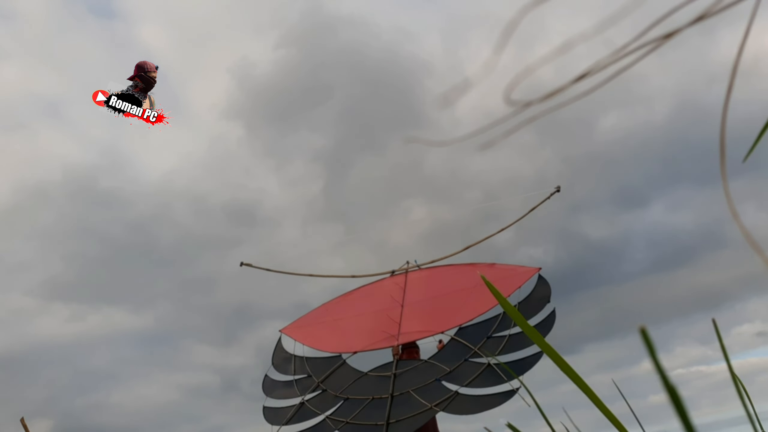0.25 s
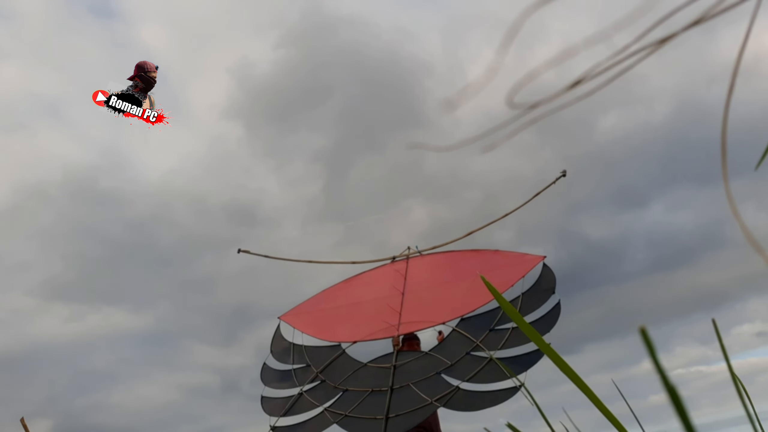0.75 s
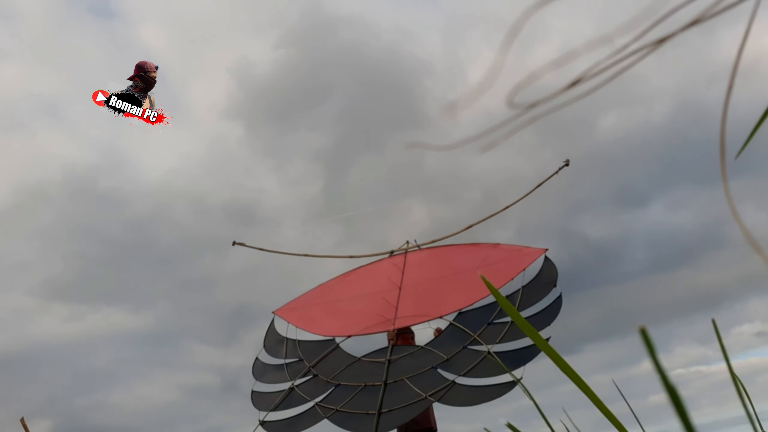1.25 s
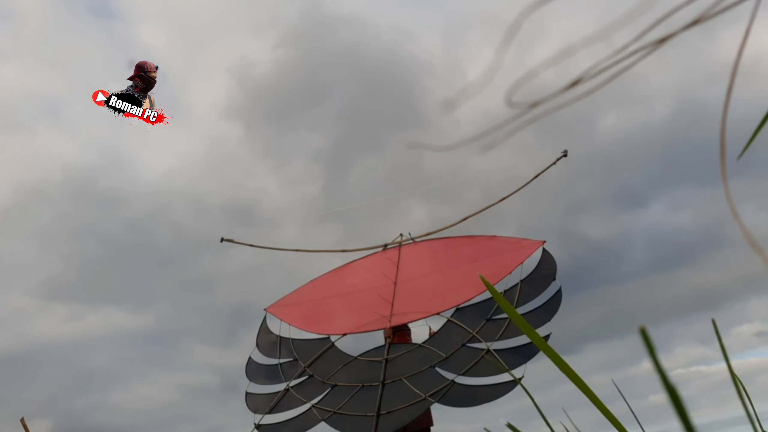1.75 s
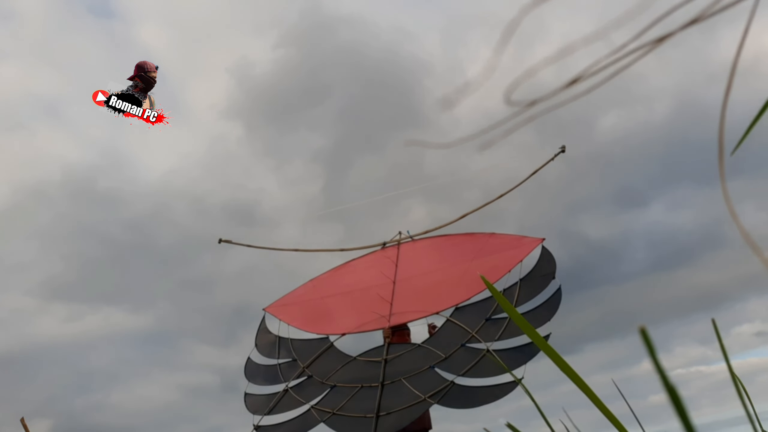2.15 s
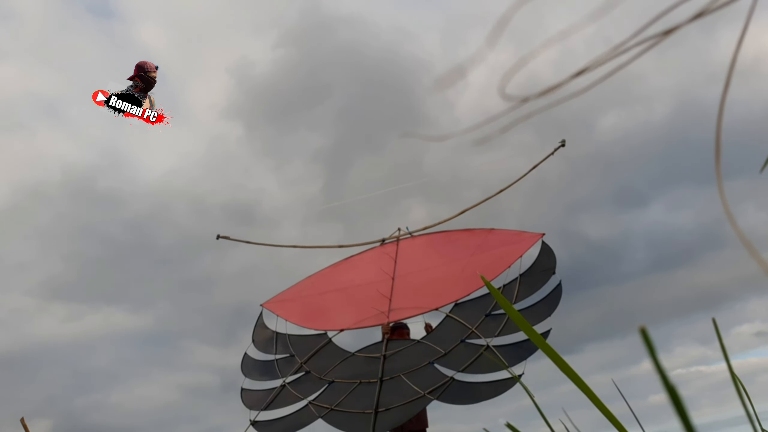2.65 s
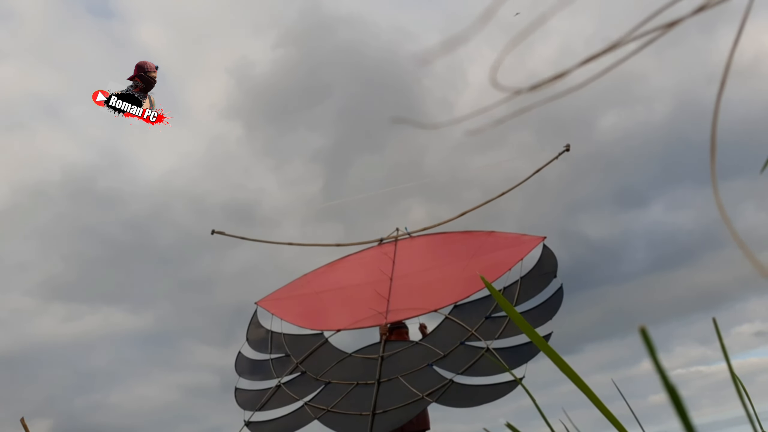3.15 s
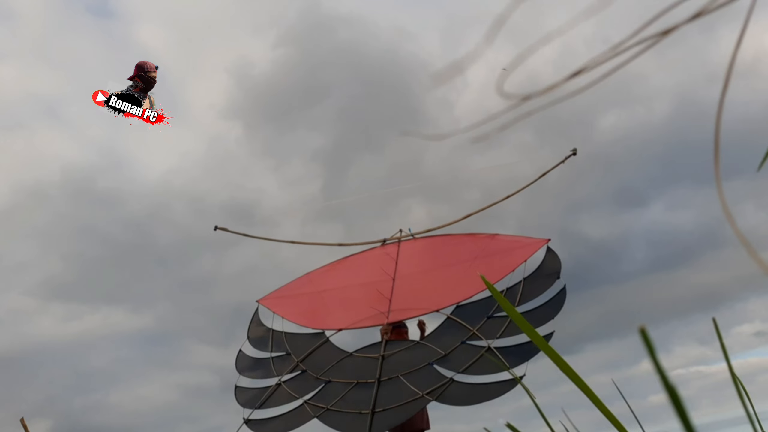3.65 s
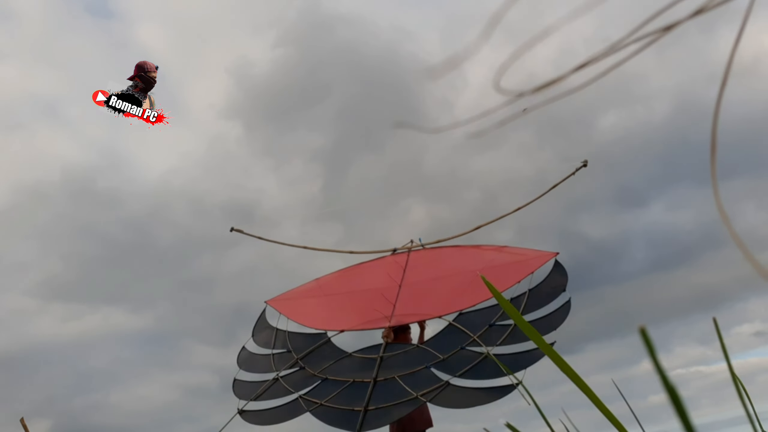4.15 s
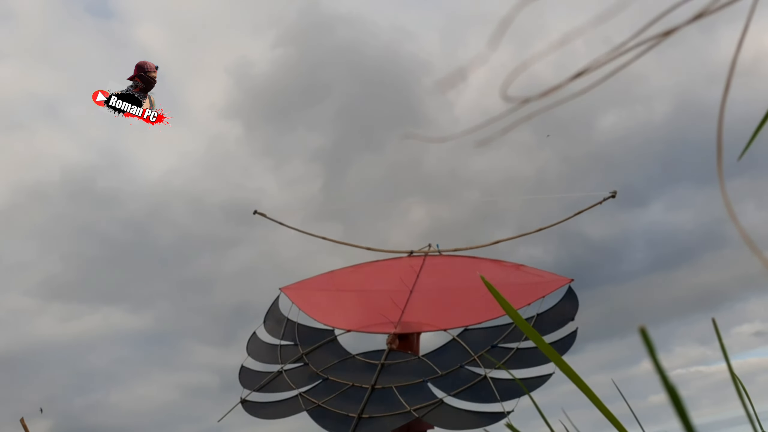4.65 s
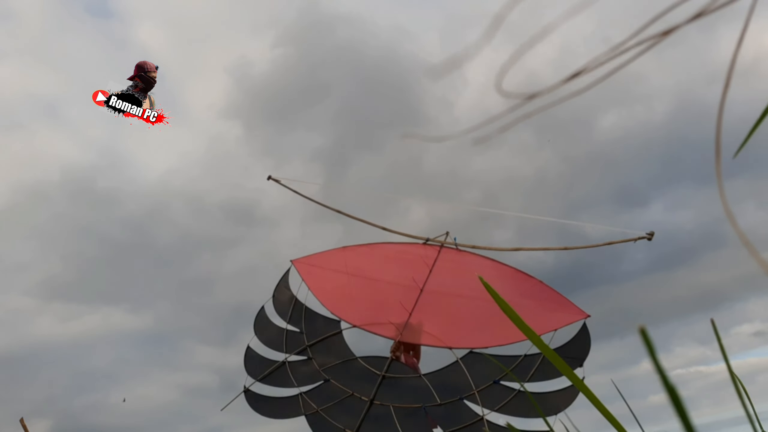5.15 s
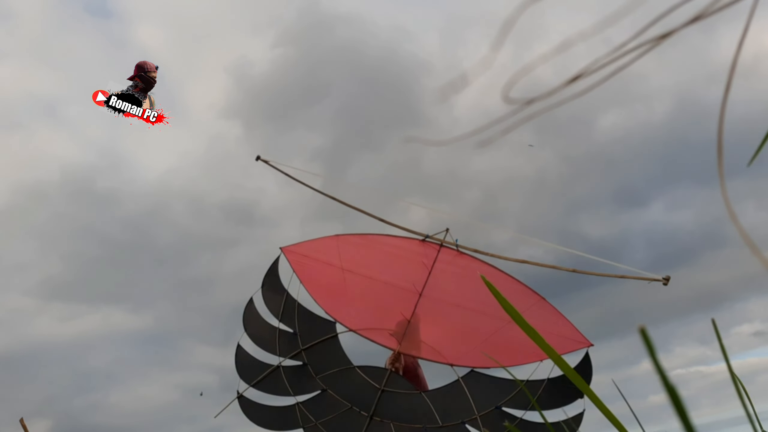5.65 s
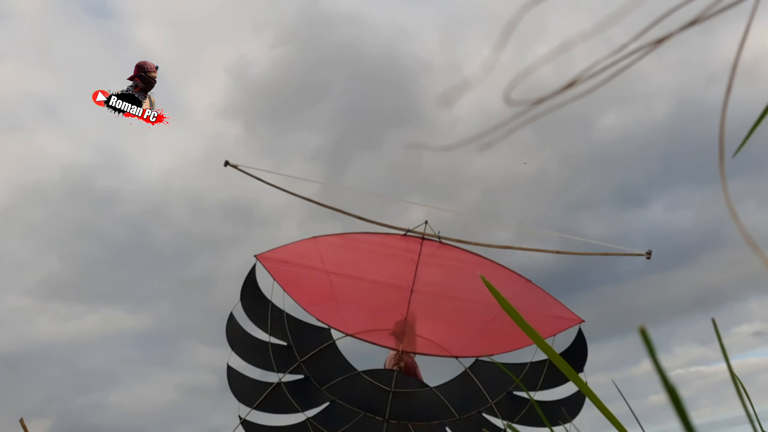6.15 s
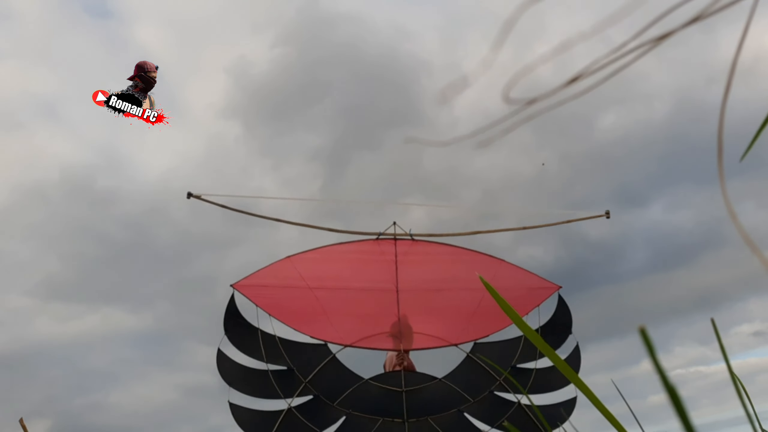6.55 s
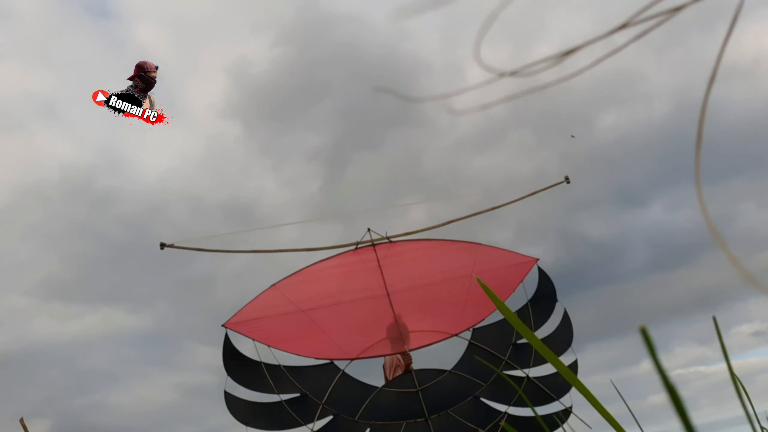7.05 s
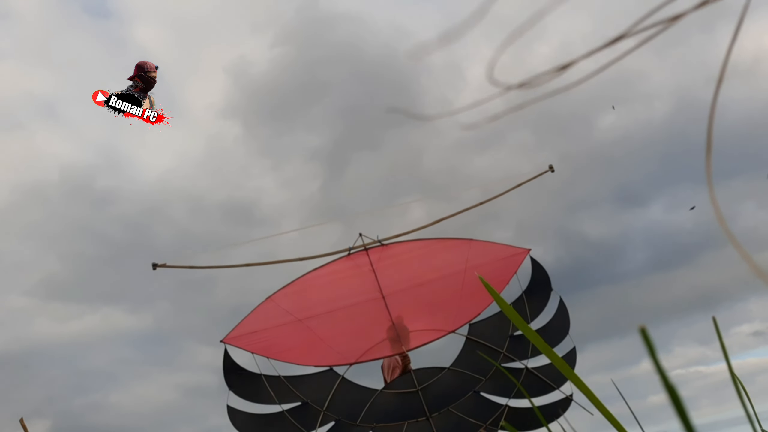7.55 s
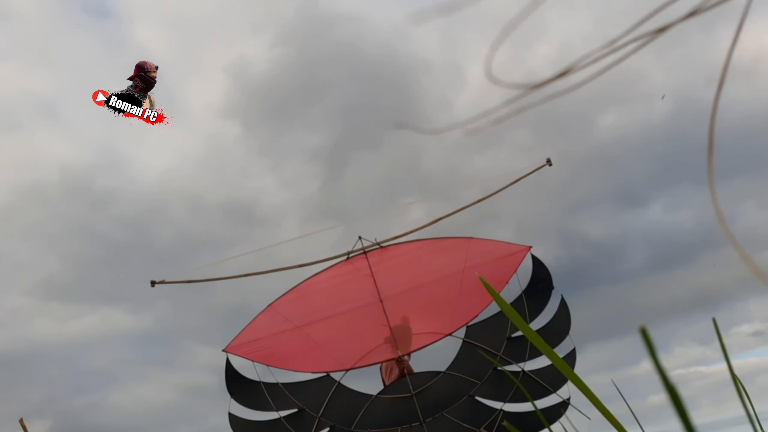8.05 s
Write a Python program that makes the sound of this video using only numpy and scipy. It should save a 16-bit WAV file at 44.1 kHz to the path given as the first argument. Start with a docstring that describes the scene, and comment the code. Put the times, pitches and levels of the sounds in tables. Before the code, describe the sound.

Deep fluttering drone of a wind-driven ribbon overhead, about twenty paired thuds a second, over distant humming, bird peeps, insect hiss and grass crackles.

```python
"""The ribbon of a bow hummer on a large kite flips over about twenty times a second, each flip a double thud:
two pressure pulses in quick succession. A farther ribbon whirrs in four unlike strokes of gliding tone and
turbulence, and distant ones merge into a drone of shaped noise. Small birds call in gliding sines, insects
and the hiss of the field are bands of noise, and grass beside the microphone is noise gated by contact."""
import sys
import numpy as np
from scipy import signal
from scipy.fft import rfft, irfft
from scipy.io import wavfile

SR = 44100
rng = np.random.default_rng(int(sys.argv[2]) if len(sys.argv) > 2 else 0)


def wav_out(sig):
    """Save sig, one row per channel (or a flat mono array), as 16-bit PCM at SR to the path in sys.argv[1]."""
    wavfile.write(sys.argv[1], SR, np.round(np.clip(np.atleast_2d(sig).T, -1, 1) * 32767).astype(np.int16))


N = 365588

# Background. Levels of spectra are relative densities.
# airy hiss of the field: (frequency [Hz], density [dB])
AIR_SPECTRUM = [(1060, -24.5), (1800, -22.5), (2140, -2.5), (2600, -4.5), (3510, -4.5), (4310, -3),
                (5210, -6.5), (6710, -1), (7890, 3), (9280, -4), (10300, -10.5), (15500, -14)]
# correlation of the two channels in diffuse sound: (frequency [Hz], correlation [0-1])
CHANNEL_CORRELATION = [(60, 0.71), (200, 0.71), (350, 0.98), (550, 0.51), (800, 0), (15000, 0)]
# insects and the blur of distant birds: (centre [Hz], bandwidth [Hz], level [dB])
CHORUS_BANDS = [(4300, 1300, -82), (7860, 580, -78), (9000, 730, -81)]
# soft swishes, at first and as the kite starts to roll:
# (time [s], half width [s], centre [Hz], bandwidth [Hz], level [dB])
SOFT_SWISHES = [(0.21, 0.29, 1240, 720, -64.5), (4.37, 0.5, 1300, 510, -69.5), (4.43, 0.29, 920, 320, -62)]
# swells of a thin buzz: (time [s], half width [s], level [dB])
BUZZ_SWELLS = [(.2, .2, -76), (.8, 0.36, -81), (7.1, 0.64, -80), (8.0, .33, -74)]
# distant drone and wind: (frequency [Hz], density [dB])
DRONE_SPECTRUM = [(25, -37), (38, -23), (50, -10), (65, -13), (90, -10.5), (125, -1.5), (190, -2.5),
                  (260, -10.5), (400, -12), (550, -15.5), (650, -22.5), (720, -25), (1150, -32),
                  (1600, -46.5), (2600, -57)]
# distant drone and wind: (time [s], drone level [dB], rumble level [dB])
DRONE_LEVELS = [(0, -38, -48), (2.1, -40.5, -43.5), (3.1, -39.5, -52), (4.3, -41, -49), (6.2, -40, -59.5),
                (7.4, -41, -51), (8.29, -41, -43.5)]
# distant ribbons swelling out of the drone:
# (time [s], half width [s], centre [Hz], bandwidth [Hz], stroke rate [1/s], level [dB])
DISTANT_SWELLS = [(.6, 0.57, 628, 70, 18, -60), (1.55, 0.11, 775, 23.2, 38.8, -62),
                  (6.35, 0.23, 616, 60, 14.4, -59.5)]

# the nearer birds' arched, falling peeps: (time [s], length [s], top pitch [Hz], level [dB])
PEEP_NOTES = [(.05, 0.096, 3950, -73), (0.252, 0.098, 4400, -73), (0.338, 0.13, 4790, -58),
              (0.785, 0.093, 4540, -65.5), (0.994, 0.15, 4650, -73.5), (1.082, 0.14, 3860, -74),
              (1.371, 0.097, 4815, -54), (1.693, 0.069, 4090, -69.5), (1.75, .065, 3970, -62.5),
              (1.774, 0.14, 4820, -66.5), (1.899, 0.11, 4410, -62.5), (2.092, 0.15, 4560, -68),
              (2.252, 0.055, 4320, -71.5), (2.423, 0.14, 4760, -74), (2.512, 0.12, 3953, -51.5),
              (2.698, .15, 4920, -68.5), (2.749, 0.13, 4530, -57.5), (2.968, 0.14, 4150, -67.5),
              (2.982, 0.14, 4430, -68), (3.22, .13, 4520, -72.5), (3.619, 0.14, 3990, -67.5),
              (3.779, 0.16, 4630, -64), (3.824, 0.12, 4820, -70), (4.014, 0.16, 4260, -73.5),
              (4.227, 0.12, 4100, -62.5), (4.587, 0.17, 4540, -69.5), (4.843, 0.21, 4640, -75.5),
              (5.003, 0.13, 4016, -62), (5.152, 0.15, 4790, -61), (5.232, .1, 2330, -75),
              (5.522, 0.094, 2310, -76), (5.813, 0.096, 2270, -76), (5.496, .11, 4660, -68),
              (5.516, 0.077, 4530, -66), (5.754, 0.1, 5090, -69), (5.834, .12, 4010, -66),
              (6.028, 0.23, 4500, -69.5), (6.09, 0.12, 4240, -72), (6.251, .12, 4710, -62),
              (6.371, 0.14, 4210, -70.5), (6.62, 0.16, 4020, -67.5), (6.75, 0.16, 3610, -78),
              (6.984, 0.12, 4710, -59.5), (7.327, 0.15, 3910, -69.5), (7.594, 0.053, 4180, -75),
              (7.667, 0.13, 4600, -59), (7.95, 0.13, 4650, -76), (8.15, 0.12, 3860, -70.5)]
# every peep scoops up to its top and then sags; scoop and sag are shares of the top pitch
PEEP_SCOOP_S, PEEP_SCOOP, PEEP_SAG, PEEP_SAG_POWER = 0.011, 0.082, .135, 1.8
# short, nearly level pips: (time [s], pitch [Hz], level [dB])
PIP_NOTES = [(.49, 4860, -66.5), (0.811, 4950, -63.5), (1.13, 4860, -69), (2.405, 4900, -67.5),
             (3.045, 4920, -70), (3.385, 4880, -66.5), (4.486, 4760, -67.5), (1.455, 4970, -68),
             (5.14, 6150, -75), (5.43, 6200, -76), (5.72, 6150, -77), (6.3, 6200, -77), (6.565, 6150, -73),
             (6.85, 6200, -82)]
# runs of thin ticks, growing louder towards the last: (time [s], notes [count], level of the last [dB])
TICK_RUNS = [(2.10, 2, -71), (3.42, 3, -69.5), (4.52, 4, -68), (4.83, 2, -75), (5.0, 2, -77),
             (5.38, 1, -81), (5.52, 1, -78), (5.855, 6, -66), (6.41, 1, -82), (6.735, 1, -82),
             (6.87, 1, -79), (7.01, 2, -85), (7.19, 1, -88), (7.41, 5, -73.5), (7.795, 2, -78),
             (7.98, 2, -77), (8.16, 2, -79)]
# a rising trill: (time [s], length [s], start [Hz], end [Hz], pulse rate [1/s], level [dB])
RISING_TRILL = (5.94, .195, 2990, 3280, 58, -57.5)
# scolding down-sweeps: (time [s], start pitch [Hz], level before the scold trim [dB])
SCOLD_SWEEPS = [(6.466, 3180, -62), (6.607, 3180, -61), (6.678, 3440, -58), (6.827, 3280, -62.5),
                (6.89, 3320, -63), (7.048, 3020, -68), (7.157, 3200, -73)]
SCOLD_S, SCOLD_FALL = 0.018, 0.38   # length of a sweep; share of the pitch that it drops
# the rising yips that answer each sweep: (time [s], top pitch [Hz], level before the scold trim [dB])
ANSWERING_YIPS = [(6.508, 2505, -65), (6.644, 2660, -68), (6.719, 2570, -66), (6.866, 2725, -65),
                  (6.933, 2610, -66), (7.083, 2650, -71), (7.199, 2560, -70)]

# grass brushing: (time of the middle [s], length [s], level before clumping [dB])
GRASS_RUSTLES = [(0.137, 0.32, -65), (0.562, 0.63, -69), (.96, 0.066, -69), (1.005, .14, -64.5),
                 (1.083, 0.15, -70), (5.87, 0.34, -65.5), (6.562, .15, -78), (8.22, 0.084, -70)]
# stalks snapping: (time [s], level before the snap lift [dB])
STALK_SNAPS = [(0.589, -60), (0.836, -58.5), (1.5406, -68), (1.622, -60), (1.71, -61), (1.945, -64),
               (2.436, -70), (4.6972, -64), (5.6221, -63), (5.884, -59), (6.497, -61), (6.5586, -62),
               (8.199, -55.5)]
# grass: (frequency [Hz], density [dB])
GRASS_SPECTRUM = [(700, 11), (2000, -.5), (5000, 3.5), (9000, 3), (13000, 6), (15500, -5)]

# far ribbon: (time [s], swing rate [1/s])
FAR_SWING_RATE = [(0.0, 23.479), (3.35, 23.557), (3.95, 23.782), (5.5, 23.711), (6.0, 23.45), (8.3, 23.499)]
# its middle, rasp and the rasp's edge: (centre [Hz], steady-wind level before the whirr trim [dB],
# change in a full gust [dB], left-right balance [dB], right lag [ms], stroke length [ms], turbulence [share])
FAR_WHIRR_BANDS = [(831, -60, -4.5, -10.5, 0.32, 14.41, 1), (1068, -61, 12, -9.5, -0.12, 14, 0.25),
                   (1303, -79, 14.5, 9.5, -0.28, 8.4, 0.39)]
# its four strokes, repeating every two swings: (place in the cycle [0-1], pitch [ratio],
# glide [share of pitch], rasp [dB], growl [dB], change after the roll [dB])
FAR_STROKES = [(.06, .9897, .32, 3.6, -2, -1), (.3139, 1.0492, -.305, 2.2, -1.5, 2.5),
               (.55, .9446, .1, 4.9, 2.5, -3), (.8137, 1.0931, .25, 2.3, -1, 1)]
# gusts and lulls (negative) that reach it: (time [s], half width [s], strength [share of a full gust])
WIND_GUSTS = [(.35, 0.54, 0.89), (1.2, 0.11, 0.37), (1.7, 0.26, -0.44), (2.97, 0.4, 0.73),
              (3.6, 0.18, -0.67), (4.25, 0.32, -1.27), (5.1, 0.25, -0.32), (6.35, 0.44, 0.68),
              (8.1, 0.33, 0.12)]
# its clean growl: (multiple of the stroke rate, relative level [dB])
GROWL_OVERTONES = [(8, -14), (9, -7), (10, -1), (11, 0), (12, -6), (13, -16)]
# start and end of the kite's roll, which shifts the weight among the strokes: (start [s], end [s])
ROLL_SPAN = (4.4, 6.4)
# single strokes that it whips harder: (time [s], extra growl level [dB])
HARD_STROKES = [(.833, 6.5), (1.304, 0), (3.298, 4), (6.985, 4.5), (7.28, 4), (7.538, 9), (7.791, 8),
                (8.217, 5.5)]

# near ribbon, which jumps between a slow and a fast way of flipping: (time [s], flip rate [1/s])
NEAR_FLIP_RATE = [(0, 19.12), (.55, 20.11), (1.3, 19.7), (2, 20.22), (2.6, 19.99), (2.85, 22.4),
                  (3.35, 23.15), (3.7, 22.74), (4.15, 22.17), (4.5, 22.55), (4.9, 22.44), (5.5, 22.78),
                  (6, 22.42), (6.5, 21.96), (7.15, 22.4), (7.53, 22), (7.59, 19.7), (7.85, 18.9),
                  (7.97, 20.1), (8.3, 20.2)]
# near ribbon, fading and dulling as the kite climbs:
# (time [s], level [dB], sharpness: gain of the thud's upper part [dB])
NEAR_THUD_LEVEL = [(0, -30.5, 5), (1.4, -28.5, -1), (3.5, -31.5, 2.5), (5.6, -32.5, 0.5),
                   (6.75, -32.5, -7.5), (7.53, -35.5, -4.5), (7.6, -41, 2), (7.75, -39.5, -5.5),
                   (8.29, -41.5, -11)]
# one thud: (frequency [Hz], slow-way relative level [dB], fast-way relative level [dB])
THUD_SPECTRA = [(30, -50.5, -49.5), (55, -22.5, -20.5), (77, -17, -14.5), (108, -0.5, -0.5), (142, 2, 2),
                (179, 3, 3.5), (188.8, 4.5, 4.5), (247.6, -1.5, -7), (283.3, -14, -10), (326, -15.5, -13.5),
                (406, -31, -22.5), (533, -34, -32.5), (696, -54.5, -55.5), (1400, -68.5, -70.5),
                (3000, -100, -99)]
FALTER_S, FALTER_DB = 7.58, 3.5   # from here on the near ribbon's level wavers; spread of the wavering

CUTOFF_HZ = 15600


def from_db(db):
    """Logarithmic measure: decibels to amplitude ratio."""
    return 10 ** (np.asarray(db) / 20)


def rms_one(x):
    """Normalisation: scale to unit mean power."""
    return x / np.sqrt(np.mean(x ** 2) + 1e-20)


def in_time(rows):
    """Linear interpolation: each column of a time curve at every sample."""
    s, *columns = np.transpose(rows)
    return [np.interp(np.arange(N) / SR, s, column) for column in columns]


def at_hz(points, hz):
    """Interpolation of a spectrum on a logarithmic frequency axis."""
    points = np.array(points)
    return np.interp(np.log(np.maximum(hz, 1)), np.log(points[:, 0]), points[:, 1])


def band(x, hz, width_hz, order=2):
    """Band-pass filtering about a centre frequency."""
    edges = [hz - width_hz / 2, hz + width_hz / 2]
    return signal.sosfilt(signal.butter(order, edges, "band", fs=SR, output="sos"), x + 1e-18)


def drift(rate):
    """Slow random fluctuation: normal values, rate per second, joined by straight lines."""
    knots = rng.standard_normal(int(rate * N / SR) + 2)
    return np.interp(np.arange(N) * rate / SR, np.arange(len(knots)), knots)


def bell(s, half_width_s, order=2):
    """Gaussian-like envelope of height 1 around time s; a higher order flattens its top."""
    return np.exp(-np.abs((np.arange(N) / SR - s) / half_width_s) ** order)


def delayed(x, lag_s):
    """Propagation delay, by fractional-sample interpolation."""
    return np.interp(np.arange(N) - lag_s * SR, np.arange(N), x)


def placed(x, pan_db, lag_s):
    """Level and time differences at two spaced microphones; the right one hears it lag_s later."""
    return np.array([x * from_db(pan_db / 2), delayed(x, lag_s) * from_db(-pan_db / 2)])


def add(out, s, sound):
    """Superposition: mix a short sound in at time s."""
    start = int(np.clip(s * SR, 0, N - 1))
    out[..., start:start + sound.shape[-1]] += sound[..., :N - start]


def diffuse(spectrum):
    """Diffuse field: shaped stereo noise whose channel correlation depends on frequency; rms 1."""
    hz = np.arange(N // 2 + 1) * SR / N
    mid, side = rfft(rng.standard_normal((2, N)))
    alike = np.clip(at_hz(CHANNEL_CORRELATION, hz), -1, 1)
    channels = np.sqrt(1 + alike) * mid + np.sqrt(1 - alike) * side * [[1], [-1]]
    return rms_one(irfft(from_db(at_hz(spectrum, hz)) * channels, N))


def scattered(x, scatter_db, t60):
    """Scattering from grass and trees: convolution with exponentially decaying noise."""
    tail = rng.standard_normal((2, SR // 2)) * from_db(-60 * np.arange(SR // 2) / SR / t60)
    tail /= np.sqrt(np.sum(tail[0] ** 2))
    return x + from_db(scatter_db) * signal.fftconvolve(x, tail, axes=1)[:, :N]


def beats(rate, start_turn):
    """Phase accumulation: the moments at which a vibration completes a cycle."""
    turns = np.cumsum(rate) / SR - start_turn
    return np.flatnonzero(np.diff(np.floor(turns))) / SR


def kicks(times, jitter_s, uneven_db):
    """Impulsive excitation: a click at each time, slightly uneven in moment and strength."""
    late, strong = rng.standard_normal((2, 1000))[:, :len(times)]
    out = np.zeros(N)
    index = np.clip(((times + jitter_s * late) * SR).astype(int), 0, N - 1)
    out[index] = from_db(uneven_db * strong)
    return out


def field(air_db=-74, buzz_hz=1980):
    """Band-limited noise: airy hiss, gently wavering insects, soft swishes, and a thin buzz that comes and goes."""
    out = from_db(air_db) * diffuse(AIR_SPECTRUM)
    for hz, width_hz, level_db in CHORUS_BANDS:
        insects = rms_one(band(rng.standard_normal((2, N)), hz, width_hz))
        out += from_db(level_db + 2.0 * drift(7.3)) * insects
    for s, half_width_s, hz, width_hz, level_db in SOFT_SWISHES:
        swish = rms_one(band(rng.standard_normal((2, N)), hz, width_hz))
        out += from_db(level_db) * bell(s, half_width_s) * swish
    buzz_gain = sum(from_db(level_db) * bell(s, half_width_s) for s, half_width_s, level_db in BUZZ_SWELLS)
    return out + buzz_gain * rms_one(band(rng.standard_normal((2, N)), buzz_hz, 260))


def distant_hummers(line_hz=448, line_db=-56, line_s=6.2, line_half_width_s=3.2, rumble_hz=100):
    """Incoherent summation: a faint note and a few swells over a wavering drone and a wind rumble."""
    drone_db, rumble_db = in_time(DRONE_LEVELS)
    line_gain = from_db(line_db + 2 * drift(4)) * bell(line_s, line_half_width_s)
    line_phase = 2 * np.pi * np.cumsum(line_hz * (1 + 0.008 * drift(5.5))) / SR
    out = line_gain * rms_one(np.sin(line_phase))
    for s, half_width_s, hz, width_hz, stroke_rate, level_db in DISTANT_SWELLS:
        times = beats(stroke_rate * (1 + 0.0037 * drift(1.97)), 0)
        strokes = kicks(times, jitter_s=.0001, uneven_db=2.5)
        out += from_db(level_db) * bell(s, half_width_s) * rms_one(band(strokes, hz, width_hz))
    rumble = from_db(rumble_db) * rms_one(band(rng.standard_normal(N), rumble_hz, 70, order=3))
    drone = diffuse(DRONE_SPECTRUM) * from_db(drone_db + 1.0 * drift(9.2))
    return (out + rumble + drone) * from_db([[-.2], [1.2]])   # a little stronger on the right


def whistle(length_s, contour_hz, level_db, waver=0.015, waver_hz=170):
    """Frequency modulation: an unsteady sine glides through evenly spaced pitches, from its own direction."""
    u = np.linspace(0, 1, int(length_s * SR))
    chance = rng.standard_normal(64)
    shake = np.interp(u * length_s * waver_hz, np.arange(len(chance)), chance)
    hz = np.interp(u, np.linspace(0, 1, len(contour_hz)), contour_hz) * (1 + waver * shake)
    swell = np.maximum(np.sin(np.pi * u ** 0.68), 0) * from_db(level_db + 2.56 * shake)
    phase = 2 * np.pi * np.cumsum(hz) / SR
    right_phase = phase + np.pi / 2 * np.tanh(2 * chance[-1])
    balance = from_db(chance[-2] * np.array([[1.5], [-1.5]]))
    return np.sqrt(2) * swell * np.array([np.sin(phase), np.sin(right_phase)]) * balance


def peep(length_s, top_hz, level_db, size=48):
    """Pitch contour: a slight scoop up to the top, then a warbling, ever steeper fall."""
    u = np.linspace(0, 1, size)
    turn = rng.random()
    warble = .007 * np.sin(2 * np.pi * (30 * u * length_s + turn))   # 30 Hz
    arch = 1 - PEEP_SCOOP * np.exp(-u * length_s / PEEP_SCOOP_S) - PEEP_SAG * u ** PEEP_SAG_POWER
    return whistle(length_s, top_hz * (arch + warble), level_db, waver=.005)


def far_flock(count=56, flock_db=-83, spread_db=4, low_hz=4050, high_hz=4850, length_s=0.13):
    """Multiple scattering: peeps from farther off are drawn out and blurred by strong diffuse echo."""
    out = np.zeros((2, N))
    for k, (when, pitch, loud) in enumerate(rng.random((count, 3))):
        top_hz = low_hz + (high_hz - low_hz) * pitch
        level_db = flock_db + spread_db * (loud - .5)
        add(out, (k + when) / count * N / SR, peep(length_s, top_hz, level_db))
    return scattered(out, scatter_db=-0.5, t60=0.18)


def scolding(yip_s=0.035, scold_db=-2.0):
    """Opposed frequency sweeps: one bird's steep down-sweeps, each answered by a rising yip."""
    out = np.zeros((2, N))
    for s, start_hz, level_db in SCOLD_SWEEPS:
        add(out, s, whistle(SCOLD_S, start_hz * (1 - SCOLD_FALL * np.array([0, .65, 1])), level_db))
    for s, top_hz, level_db in ANSWERING_YIPS:
        fall = whistle(yip_s, top_hz * np.array([.94, 1, .97, .86, .76]), level_db)
        add(out, s, fall[:, ::-1])   # reversed, so it rises
    return from_db(scold_db) * scattered(out, scatter_db=-6.5, t60=.26)


def birds(tick_gap_s=.058, tick_growth_db=3.0, scatter_db=-9, scatter_t60=0.18, echo_s=.021, echo_db=-13):
    """Direct sound, one echo and scatter: peeps, pips, ticks, scolding and an amplitude-modulated trill."""
    out = scolding()
    for s, length_s, top_hz, level_db in PEEP_NOTES:
        add(out, s, peep(length_s, top_hz, level_db))
    for s, hz, level_db in PIP_NOTES:
        add(out, s, whistle(0.041, [.98 * hz, hz, 0.92 * hz], level_db, waver=.004))
    for s, notes, last_db in TICK_RUNS:
        notes = round(notes)
        for k in range(notes):
            level_db = last_db - tick_growth_db * (notes - 1 - k)
            add(out, s + k * tick_gap_s, whistle(0.032, [5880, 5500], level_db, waver=0.0031))
    s, length_s, start_hz, end_hz, pulse_hz, level_db = RISING_TRILL
    # reversed, so it swells slowly and stops quickly
    trill = whistle(length_s, [end_hz, start_hz], level_db, waver=0.0075)[:, ::-1]
    pulses = 1 + .8 * np.sin(2 * np.pi * pulse_hz * np.arange(trill.shape[1]) / SR)
    add(out, s, trill * pulses)
    out = out + from_db(echo_db) * np.array([delayed(side, echo_s) for side in out])
    return scattered(out, scatter_db, scatter_t60)


def grass(clump_db=4.5, snap_s=0.0016, snap_db=6.0):
    """Friction noise: grainy contact gates the brushing of blades; snapping stalks decay exponentially."""
    contact = np.zeros(N)
    for s, length_s, level_db in GRASS_RUSTLES:
        add(contact, s - length_s / 2, from_db(level_db) * signal.windows.hann(int(length_s * SR)))
    contact *= from_db(clump_db * drift(130))
    contact *= rms_one(from_db(5 * drift(2200)))   # fine grain
    for s, level_db in STALK_SNAPS:
        decay = np.exp(-np.arange(SR // 40) / SR / snap_s)
        add(contact, s, from_db(level_db + snap_db) * decay)
    return contact * diffuse(GRASS_SPECTRUM)


def twirl(hz, glide, length_ms):
    """Tone burst: the ribbon spins through one stroke, a short gliding tone that swells and fades."""
    u = np.linspace(-.5, .5, int(length_ms * SR / 10 ** 3))
    return np.cos(np.pi * u) ** 2 * np.sin(2 * np.pi * np.cumsum(hz * (1 + glide * u)) / SR)


def far_growl(rate, wind, rolled, jolt_db, growl_db=-51.0, gust_db=10, waver_db=1.2):
    """Harmonic series: the far ribbon's low, clean overtones, weighted in turn by each of the four strokes."""
    turns = np.cumsum(rate / 2) / SR   # one turn is two swings
    place, _, _, _, stroke_db, roll_db = np.transpose(FAR_STROKES)
    roll_change_db = rolled * np.interp(turns, place, roll_db, period=1)
    weight_db = np.interp(turns, place, stroke_db, period=1) + roll_change_db
    stroke_phase = 2 * np.pi * len(FAR_STROKES) * (turns - place[0])
    tone = sum(from_db(level_db + waver_db * drift(3.1)) * np.cos(k * stroke_phase)
               for k, level_db in GROWL_OVERTONES)
    level_db = growl_db + gust_db * wind + jolt_db
    return placed(rms_one(tone * from_db(weight_db)) * from_db(level_db), pan_db=5, lag_s=0.00047)


def far_hummer(whirr_db=-2.0, waver_db=1.44):
    """Periodic tone bursts with turbulence: four strokes in turn; gusts feed growl and rasp, lulls the middle."""
    rate, = in_time(FAR_SWING_RATE)
    wind = sum(strength * bell(s, half_width_s, order=3) for s, half_width_s, strength in WIND_GUSTS)
    rolled = np.interp(np.arange(N) / SR, ROLL_SPAN, [0, 1])
    jolt_db = sum(extra_db * bell(s, .012, order=4) for s, extra_db in HARD_STROKES)
    puff = signal.windows.hann(SR // 100)   # 10 ms of turbulence per stroke
    out = far_growl(rate, wind, rolled, jolt_db)
    for hz, steady_db, gust_db, pan_db, lag_ms, length_ms, rough in FAR_WHIRR_BANDS:
        tone, air = 0, 0
        for place, ratio, glide, stroke_db, _, roll_db in FAR_STROKES:
            clicks = kicks(beats(rate / 2, place), jitter_s=.00003, uneven_db=1.4)
            strokes = from_db(stroke_db + roll_db * rolled) * clicks
            tone = tone + signal.fftconvolve(strokes, twirl(hz * ratio, glide, length_ms), "same")
            air = air + signal.fftconvolve(strokes, puff, "same")
        turbulence = rms_one(band(air * rng.standard_normal(N), hz, 0.29 * hz))
        whirl = rms_one(tone) + rough * turbulence
        level_db = whirr_db + steady_db + gust_db * wind + waver_db * drift(5.4)
        out = out + placed(rms_one(whirl) * from_db(level_db), pan_db, lag_ms / 10 ** 3)
    return out


def pull_and_push(spectrum, size=4096):
    """Antisymmetric pulse of given spectrum: suction first, then an equal push."""
    gain = from_db(at_hz(spectrum, np.arange(size // 2 + 1) * SR / size))
    return np.roll(irfft(-1j * gain), size // 2)


def near_hummer(second_db=0.0, echo_s=0.01039, echo_db=-17, late_s=0.02163, late_db=-20, edge_hz=215):
    """Paired impulsive radiation: the ribbon snaps over twice on every flip; two faint reflections follow."""
    rate, = in_time(NEAR_FLIP_RATE)
    flips = beats(rate, .6)
    level_db, sharp_db = in_time(NEAR_THUD_LEVEL)
    level_db = level_db + FALTER_DB * (np.arange(N) / SR > FALTER_S) * drift(20)
    apart_s = np.interp(flips, [2.6, 2.85], [.0072, .0069])   # the pair closes up slightly
    first = kicks(flips, jitter_s=.00005, uneven_db=.6)
    second = kicks(flips + apart_s, jitter_s=.00005, uneven_db=.6)
    snaps = first + from_db(second_db) * second
    fast = np.clip((rate - 20.2) / 2, 0, 1)   # 0 in the slow way of flipping, 1 in the fast
    slow_thud, fast_thud = (pull_and_push(np.array(THUD_SPECTRA)[:, [0, k]]) for k in (1, 2))
    slow_thuds = signal.fftconvolve(snaps * (1 - fast), slow_thud, "same")
    thuds = slow_thuds + signal.fftconvolve(snaps * fast, fast_thud, "same")
    # a harder snap is richer in overtones
    edge = signal.sosfiltfilt(signal.butter(3, edge_hz, "high", fs=SR, output="sos"), thuds)
    thuds = thuds + (from_db(sharp_db) - 1) * edge
    thuds = thuds + from_db(echo_db) * delayed(thuds, echo_s) + from_db(late_db) * delayed(thuds, late_s)
    return placed(rms_one(thuds) * from_db(level_db), pan_db=-1.5, lag_s=-.00018)


def scene():
    """Superposition: hummers overhead, the living field all around."""
    return near_hummer() + far_hummer() + distant_hummers() + birds() + far_flock() + field() + grass()


def record(dry):
    """Low-pass filtering: the top is cut steeply."""
    return signal.sosfilt(signal.ellip(12, .1, 90, CUTOFF_HZ, fs=SR, output="sos"), dry)


dry = scene()
out = record(dry)
wav_out(out)
```